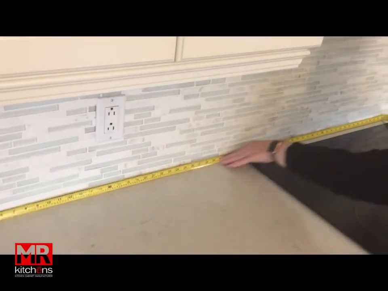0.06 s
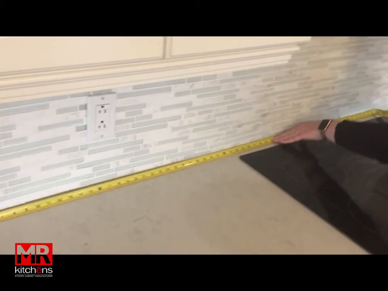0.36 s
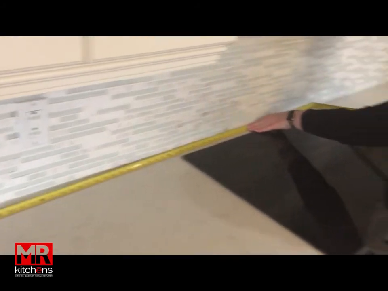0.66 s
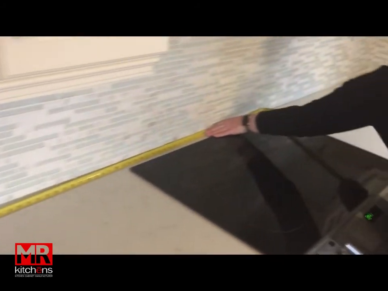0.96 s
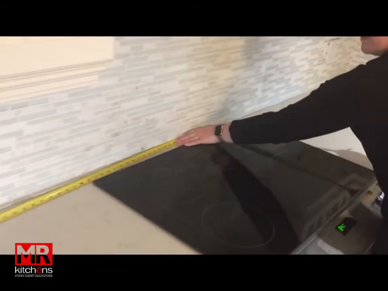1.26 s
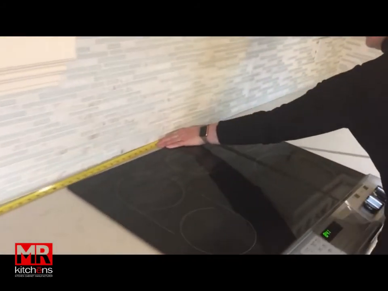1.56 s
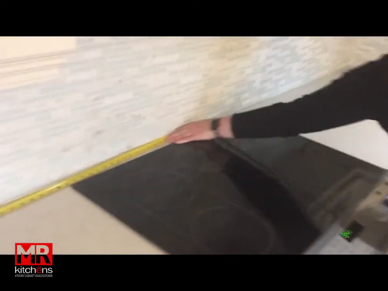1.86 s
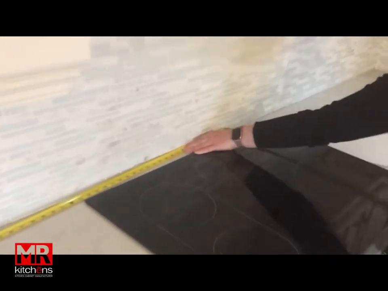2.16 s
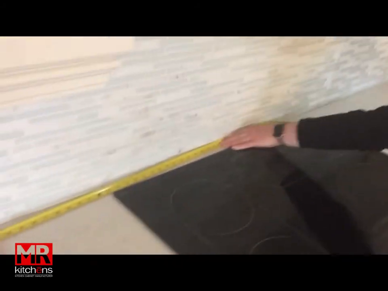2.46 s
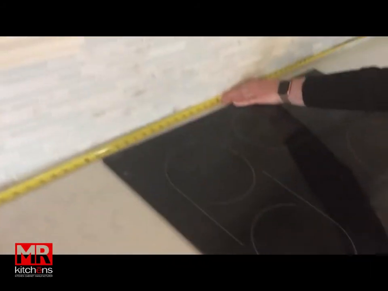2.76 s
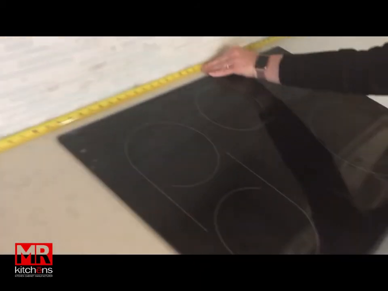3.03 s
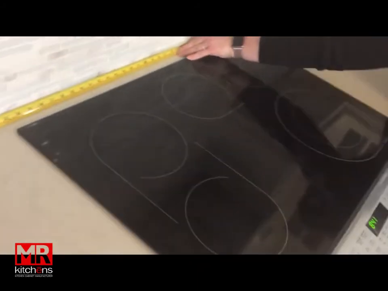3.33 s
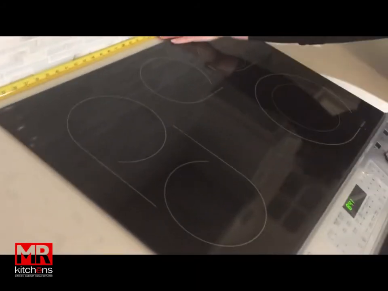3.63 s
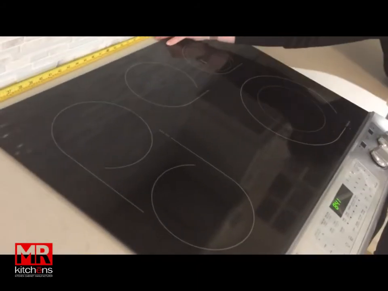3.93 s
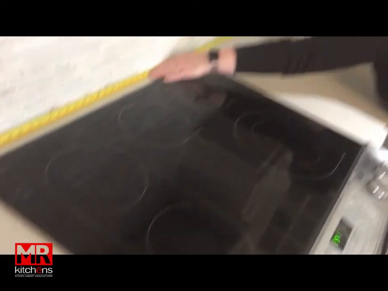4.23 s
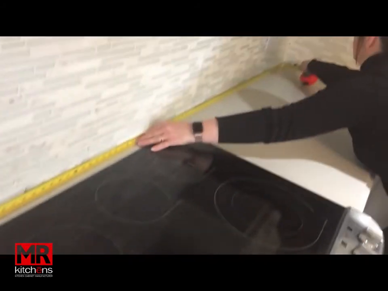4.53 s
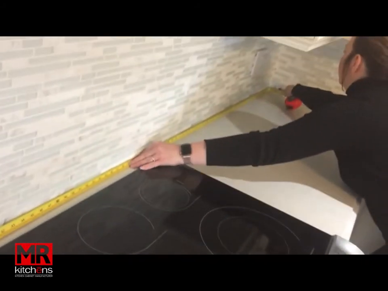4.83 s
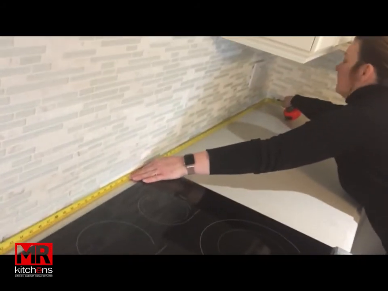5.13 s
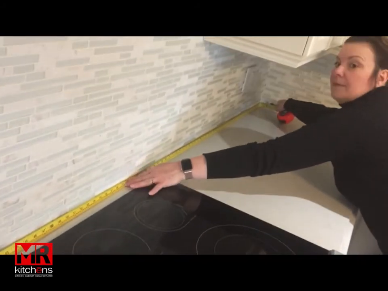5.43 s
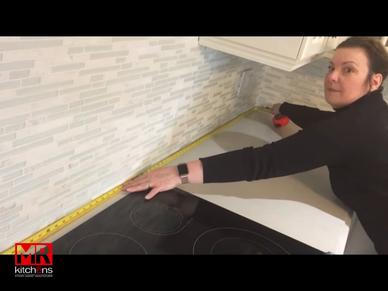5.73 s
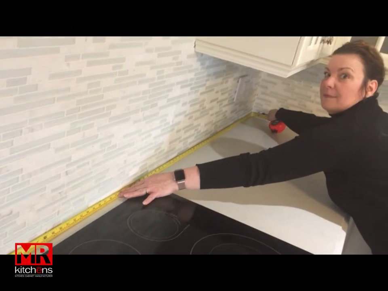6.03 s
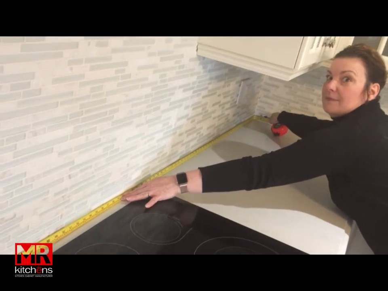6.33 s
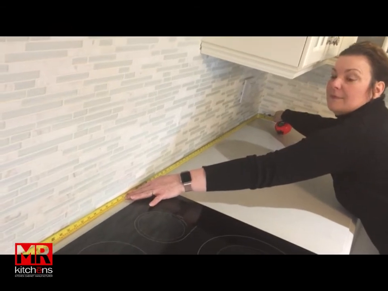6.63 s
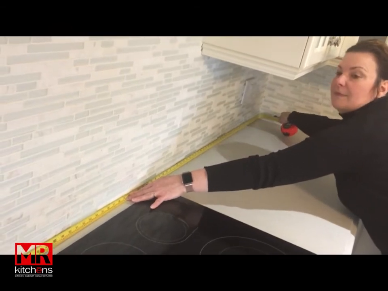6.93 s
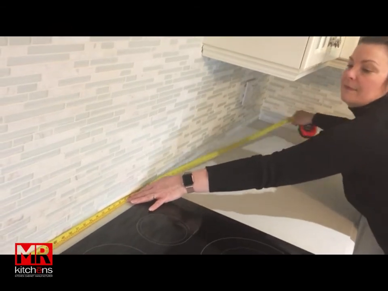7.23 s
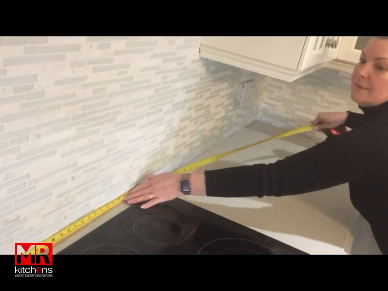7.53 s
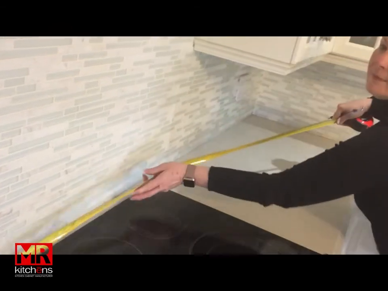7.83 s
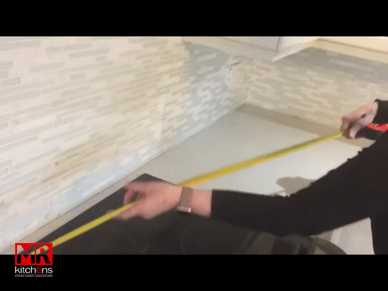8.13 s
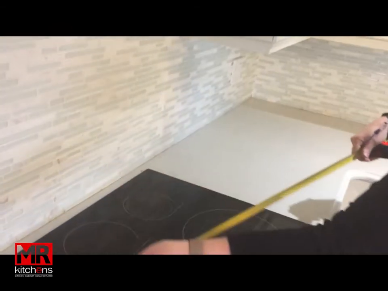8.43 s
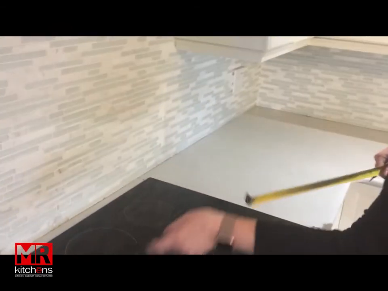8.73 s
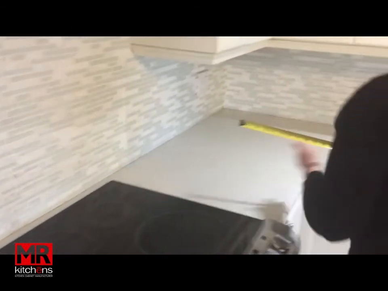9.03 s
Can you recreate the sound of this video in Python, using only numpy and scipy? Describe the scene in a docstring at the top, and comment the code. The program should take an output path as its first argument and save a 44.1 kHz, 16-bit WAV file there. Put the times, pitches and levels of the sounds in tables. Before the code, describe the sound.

Thin metal tape slides and clicks over a kitchen counter, goes quiet, then clatters back in, in a small tiled room.

```python
"""A steel tape measure slides along a tiled wall and a kitchen worktop, rests, then is lifted and reeled in.
Friction and impact drive its thin blade: it scrapes, buckles and chatters, and stick-slip makes it squeak.
A hand rubs and knocks on the worktop, exciting the slab's modes and the hollow cabinet below.
The small tiled room reverberates after every clack, over a faint mains hum."""
import sys
import numpy as np
from scipy import signal
from scipy.fft import rfft, irfft
from scipy.io import wavfile

SR = 44100
rng = np.random.default_rng(int(sys.argv[2]) if len(sys.argv) > 2 else 0)


def dump_mix(stems):
    """Bounce the given channels to the path in sys.argv[1] as a 16-bit WAV at rate SR."""
    frames = np.atleast_2d(stems).T  # one column per channel
    limited = np.clip(frames, -1, 1)  # hard clip at full scale
    pcm = np.round(limited * 32767).astype(np.int16)
    wavfile.write(sys.argv[1], SR, pcm)


N = 400869
T = np.arange(N) / SR

# Spectral shape of the room's steady noise: frequency_hz, density_db
AIR_SPECTRUM = [(25, -22.5), (55, -14), (90, -19), (330, -19), (520, -27.5), (1100, -29.5), (16000, -44.5)]
# Pushes and pulls of the blade (flex and fizz relative to level):
# start_s, end_s, level_db, swell_db, flex_db, fizz_db
BLADE_STROKES = [ (0, 0.083, -70.5, 0, 4.5, 15), (0.104, 0.308, -51.5, -8.5, -13, -4),
                 (0.354, 0.51, -61.5, 12, -11, 3.5), (0.538, 0.65, -49.5, -5, -5, -9.5),
                 (.72, 1.06, -77, -4, 5.5, -2), (1.131, 1.265, -35.5, 1.5, -6, -7.5),
                 (1.375, 1.58, -42, -9.5, -2, -5.5), (1.604, 1.874, -46, -6.5, -6, -5.5),
                 (1.967, 2.096, -45.5, -4, -16.5, -8), (2.15, 2.33, -43, -2, -0.5, -27),
                 (2.333, 2.435, -22, 3, -14.5, -17), (2.495, 2.656, -25, -6, -15, -7.5),
                 (2.692, 2.735, -24, -1.5, -11, -10), (2.825, 2.979, -31, -2, -7.5, -6.5),
                 (3.01, 3.412, -44.5, 0.5, -8, -0.5), (3.473, 3.589, -38, -6.5, -7, -11.5),
                 (3.716, 3.8, -73, 7, -3.5, 0.5), (3.825, 3.896, -52, -3, -16.5, -6.5),
                 (3.949, 4.161, -67, -2, -9, -3), (4.53, 4.61, -68, -8, -7, 4),
                 (4.697, 5.043, -78.5, -2.5, 4.5, -6.5), (6.85, 7.144, -56.5, 16.5, -5, -0.5),
                 (7.225, 7.29, -23.5, -2, -14.5, -22), (7.32, 7.56, -38.5, 3, -10.5, -12),
                 (7.648, 7.671, -36, 8.5, -19, 1.5), (7.716, 7.96, -48.5, -4, -9, 1.5),
                 (8.005, 8.146, -28, -1, -12, -11), (8.221, 8.454, -35, -15, -6, -10),
                 (8.46, 8.672, -33.5, -5, -13.5, -10.5), (8.718, 8.97, -53, -12.5, -5.5, -30)]
# Broad frequency response of the steel strip: frequency_hz, gain_db
BLADE_RESPONSE = [(180, -41.5), (300, -18.5), (737, -8.5), (1510, -7), (1870, -9), (2210, -3), (3640, -0.5),
                  (4230, -0.5), (4910, -4.5), (6200, -1.5), (7950, -7), (8940, -7), (10600, -13),
                  (13800, -11.5), (16000, -19.5)]
# Resonances of the long sliding span: centre_hz, width_hz, strength_db
SPAN_RESONANCES = [(1225, 150, -2.5), (2230, 1200, -4), (3500, 1800, -4.5)]
# The blade strikes or buckles (fizz relative to level): start_s, level_db, fizz_db, decay_s, ring_hz
BLADE_IMPACTS = [ (0.042, -48.5, -18, .006, 1260), (0.222, -38, -9, 0.0049, 5700),
                 (0.504, -36.5, -2.5, 0.021, 4500), (.582, -33, -12, 0.0062, 4450),
                 (0.905, -54.5, -5, 0.0061, 1100), (1.101, -43, -2, .011, 1440),
                 (1.166, -16, -1.5, 0.0059, 5100), (1.174, -27.5, -16, 0.025, 1194),
                 (1.342, -24, -1, .016, 2540), (1.430, -23, -2, 0.008, 2520),
                 (1.490, -27.5, -9, 0.0074, 2360), (1.892, -21, -5, 0.0084, 5000),
                 (1.919, -25, -0.5, .017, 4170), (2.174, -37, -7.5, 0.0091, 3050),
                 (2.329, -30, 2.5, .018, 3750), (2.452, -8.5, -1.5, 0.031, 3420),
                 (2.593, -21, 1, .011, 6840), (2.663, -16, -5, 0.019, 3440),
                 (2.758, -18.5, -8.5, 0.018, 3480), (2.904, -17.5, -4, 0.0093, 2800),
                 (3.326, -28, -12, 0.016, 1410), (3.419, -33, -10, 0.022, 1290),
                 (4.216, -58.5, 1.5, 0.013, 1310), (4.622, -60, -11, 0.024, 1900),
                 (5.588, -52, -20, 0.0075, 2200), (6.776, -64, -12, .03, 710),
                 (6.813, -53.5, -12, 0.011, 3150), (6.898, -49.5, -20.5, 0.019, 2550),
                 (7.068, -40, -9, 0.0087, 2300), (7.158, -17.5, .5, 0.042, 5800),
                 (7.192, -14.5, -11, 0.029, 6500), (7.48, -20.5, -8.5, 0.0065, 3740),
                 (7.546, -17, -10, 0.0046, 3800), (7.877, -35.5, -23, 0.017, 2310),
                 (7.959, -26, -16, 0.014, 1950), (7.985, -24, -9, 0.0095, 2170),
                 (8.013, -28, 4.5, 0.014, 1660), (8.150, -23.5, -7.5, 0.018, 2260),
                 (8.206, -14.5, -5, 0.017, 4070), (8.256, -18.5, 0, .017, 3380),
                 (8.361, -24.5, 0, 0.0074, 4240), (8.473, -20, -8, 0.014, 2580),
                 (8.503, -23.5, -8, 0.019, 2920), (8.745, -36.5, -8, 0.0086, 3750),
                 (8.808, -35.5, -3, 0.0093, 3340), (8.896, -40.5, -12, 0.012, 3070),
                 (8.972, -41.5, -24, 0.005, 4030), (9.073, -40.5, -10, 0.018, 3900)]
# The thin edge just touches the tile: start_s, level_db
EDGE_TICKS = [(1.702, -40), (2.245, -59), (2.295, -44), (3.823, -46), (4.038, -60.5), (4.13, -62.5),
              (4.474, -61.5), (4.516, -58), (4.898, -62.5), (5.011, -62)]
# Hand and case drag over the worktop: start_s, end_s, level_db
WORKTOP_DRAGS = [(0.182, .24, -62), (0.585, 0.642, -59), (1.167, 1.458, -48), (2.63, 2.98, -43.5),
                 (3.04, 3.08, -52.5), (3.17, 3.297, -55), (3.437, 3.566, -53), (3.7, 4.02, -72),
                 (6.77, 7.046, -62), (7.176, 7.293, -45.5), (7.39, 7.525, -60.5), (8.347, 8.553, -52),
                 (8.724, 8.83, -57)]
# Frequency response of the hollow cabinet: frequency_hz, gain_db
CABINET_RESPONSE = [(18, -49), (30, -22.5), (133, -5), (161, 0), (194, -0.5), (259, 4), (297, -2),
                    (479, -2.5), (516, -6.5), (600, -1.5), (780, -36), (1320, -120)]
# Palm or fingertip strikes the worktop: start_s, force_db, contact_s
HAND_KNOCKS = [(0.596, 25, 0.032), (1.177, 28.5, 0.018), (1.35, 25, 0.023), (2.712, 39, 0.055),
               (4.629, 1.5, 0.0004), (5.592, 3.5, 0.0006), (7.875, 2.5, 0.00094)]
# Normal modes of the worktop: frequency_hz, gain_db, t60_s
WORKTOP_MODES = [(50.6, -76, .35), (76.7, -61.5, 0.2), (105, -61, 0.27), (175, -52.5, 0.14),
                 (279.6, -50.5, 0.13), (387, -46.5, 0.17), (425, -52, 0.17), (476, -45.5, 0.046),
                 (590, -43.5, 0.053), (736, -50.5, .15), (794, -44.5, 0.12), (1078, -48.5, 0.084)]
# Stick-slip tones, low from the fingers, high from the blade's edge: start_s, length_s, pitch_hz, level_db
STICK_SLIPS = [(1.342, 0.031, 2475, -36.5), (1.432, 0.03, 2556, -30), (1.475, 0.14, 2500, -47),
               (1.895, 0.078, 276, -51), (2.093, 0.043, 261, -42), (2.142, .14, 259.4, -52.5),
               (2.345, 0.045, 163.6, -43.5), (4.635, 0.088, 167.4, -50.5), (4.86, .18, 163, -54.5),
               (7.985, 0.071, 14250, -44), (8.208, 0.11, 14300, -30), (8.33, .07, 14170, -41),
               (8.49, 0.055, 413, -44.5)]
# Reverberation time of the tiled room: frequency_hz, t60_s
ROOM_DECAY = [(120, 0.54), (500, 0.41), (1500, 0.35), (3500, 0.4), (7000, 0.31), (14000, 0.26)]


def gain_of(db):
    """Amplitude ratio of a level in decibels."""
    return 10 ** (np.asarray(db) / 20)


def unit_rms(x):
    """Normalisation to unit mean power."""
    return x / np.sqrt(np.mean(x ** 2) + 1e-20)


def curve_at(points, hz):
    """Interpolation on a logarithmic frequency axis."""
    table_hz, values = np.transpose(points)
    return np.interp(np.log(hz + 1), np.log(table_hz + 1), values)


def add(mix, start_s, sound):
    """Superposition of a sound on the mix."""
    part = mix[max(round(start_s * SR), 0):][:len(sound)]
    part += sound[:len(part)]


def colour(x, response, size=4096):
    """Minimum-phase filtering, of unit energy, with a magnitude shaped like response(hz)."""
    hz = abs(np.fft.fftfreq(size, 1 / SR))
    log_gain = np.log(np.maximum(response(hz), 1e-5))
    taps = np.fft.ifft(np.exp(np.conj(signal.hilbert(log_gain)))).real[:size // 2]
    return signal.oaconvolve(x, taps / np.linalg.norm(taps))[:N]


def wander(cutoff_hz):
    """Random fluctuation: low-pass noise of unit rms."""
    hz = np.fft.rfftfreq(N, 1 / SR)
    return unit_rms(irfft(rfft(rng.standard_normal(N)) / (1 + (hz / cutoff_hz) ** 4), N))


def background(air_db=-68, hum_db=-73.5, hum_hz=119.6):
    """Stationary sound: broadband room noise and an appliance humming at twice the mains frequency."""
    air = colour(rng.standard_normal(N), lambda hz: gain_of(curve_at(AIR_SPECTRUM, hz)))
    hum = unit_rms(np.sin(2 * np.pi * hum_hz * T))
    return gain_of(air_db) * air + gain_of(hum_db) * hum


def stroke(start_s, end_s, swell_db, attack_s=.018, release_s=.015):
    """Friction follows motion: the envelope rises, swells or slackens, then decays exponentially."""
    outside = np.maximum(start_s - T, 0) / attack_s + np.maximum(T - end_s, 0) / release_s
    swell = gain_of(np.interp(T, [start_s, end_s], [-swell_db / 2, swell_db / 2]))
    return np.exp(-np.minimum(outside, 20)) * swell


def slide_forces(clang_db=-4.5):
    """Sliding friction drives the blade: three force envelopes, for flex, clang and fizz."""
    forces = np.zeros((3, N))
    for start_s, end_s, level_db, swell_db, flex_db, fizz_db in BLADE_STROKES:
        envelope = gain_of(level_db) * stroke(start_s, end_s, swell_db)
        forces += np.outer(gain_of([flex_db, clang_db, fizz_db]), envelope)
    return forces


def roughness(per_s, spread_db, smooth):
    """Contact noise: random impulses of uneven size over a smooth Gaussian rub."""
    sizes = gain_of(spread_db * np.minimum(rng.exponential(1, N), 4))
    impulses = sizes * rng.choice([-1, 1], N) * (rng.random(N) < per_s / SR)
    return unit_rms(unit_rms(impulses) + smooth * rng.standard_normal(N))


def steel_band(hz, low_hz, high_hz, modes):
    """Resonance peaks lift the strip's broad response, taken within one steep-sided band."""
    peaks = sum(gain_of(db) / (1 + (2 * (hz - centre) / width) ** 2) for centre, width, db in modes)
    band = np.sqrt((1 - 1 / (1 + (hz / low_hz) ** 10)) / (1 + (hz / high_hz) ** 10))
    return gain_of(curve_at(BLADE_RESPONSE, hz)) * (1 + peaks) * band


def blade(forces, contacts_per_s, smooth, modes=(), edges_hz=(1, 2050, 4700, 8800, SR)):
    """Forced vibration, low to high: the strip flexes, its curve clangs and shines, its edge fizzes."""
    flex, clang, fizz = forces
    shine = gain_of(1) * np.sqrt(clang * fizz)
    out = np.zeros(N)
    for force, low_hz, high_hz in zip((flex, clang, shine, fizz), edges_hz, edges_hz[1:]):
        drive = force * roughness(contacts_per_s, spread_db=3.5, smooth=smooth)
        out += colour(drive, lambda hz: steel_band(hz, low_hz, high_hz, modes))
    return out


def blow(decay_s):
    """Impact envelope: a quick linear rise, then exponential decay as the blade bounces."""
    t, rise_s = np.arange(SR // 3) / SR, .3 * decay_s
    return np.minimum(t / rise_s, 1) * np.exp(-np.maximum(t - rise_s, 0) / decay_s)


def scrape(forces, judder_db=.78, snags_per_s=20, snag_db=-4.5):
    """Friction noise: the edge crosses grit and grout under uneven pressure, and sometimes snags."""
    onsets = 1. * (rng.random(N) < snags_per_s / SR)
    snags = signal.oaconvolve(onsets, blow(decay_s=.00707))[:N]
    grip = gain_of(judder_db * wander(cutoff_hz=18)) * (1 + gain_of(snag_db) * snags)
    return blade(forces * grip, contacts_per_s=1400, smooth=.61, modes=SPAN_RESONANCES)


def pings(clang, per_s=70, gain_db=-9, t60_s=.06, low_hz=1500, high_hz=5900):
    """Free vibration: each small buckle of the sliding blade releases a damped sinusoid."""
    out, t = np.zeros(N), np.arange(SR // 6) / SR
    for when, pitch, size in rng.random((round(per_s * N / SR), 3)):
        onset = int(when * N)
        hz = low_hz * (high_hz / low_hz) ** pitch
        envelope = gain_of(gain_db + curve_at(BLADE_RESPONSE, hz) - 60 * t / t60_s)
        add(out, onset / SR, 2 * size * clang[onset] * envelope * np.sin(2 * np.pi * hz * t))
    return out


def impact_forces(tick_shares_db=(-8.5, -3.5, 6.5), tick_decay_s=.009):
    """Impulsive excitation: blows and ticks sum into force envelopes for flex, clang and fizz."""
    impacts = []
    for start_s, level_db, fizz_db, decay_s, ring_hz in BLADE_IMPACTS:
        flex_db = -12.5 - 6.5 * np.log2(ring_hz / 3000)  # a longer free length rings lower, flexes more
        impacts.append((start_s, level_db, (flex_db, 0, fizz_db), decay_s))
    impacts += [(start_s, level_db, tick_shares_db, tick_decay_s) for start_s, level_db in EDGE_TICKS]
    forces = np.zeros((3, N))
    for start_s, level_db, shares_db, decay_s in impacts:
        for force, share_db in zip(forces, shares_db):
            add(force, start_s, gain_of(level_db + share_db) * blow(decay_s))
    return forces


def clacks(forces, clang_db=-3):
    """Chatter: the rebounding blade makes a rapid run of hard contacts."""
    return blade(forces * gain_of([[0], [clang_db], [0]]), contacts_per_s=4500, smooth=.58)


def rings(gain_db=-5.5, quality=9, level_slope=.85):
    """Resonance of the free length between hand and wall; light blows ring more for their size."""
    out = np.zeros(N)
    for start_s, level_db, _, decay_s, ring_hz in BLADE_IMPACTS:
        envelope = blow(decay_s)
        drive = envelope * rng.standard_normal(len(envelope))
        ring = signal.lfilter(*signal.iirpeak(ring_hz, quality, SR), drive)
        ring *= np.linalg.norm(envelope) / np.linalg.norm(ring)
        add(out, start_s, gain_of(level_slope * level_db + gain_db) * ring)
    return out


def rumble(impact_flex, slide_flex, thud_db=-18, rub_db=-21):
    """Structure-borne sound: drags, blows and the sliding blade shake the hollow cabinet."""
    drag = sum(gain_of(db) * stroke(start_s, end_s, swell_db=-5) for start_s, end_s, db in WORKTOP_DRAGS)
    force = gain_of(thud_db) * impact_flex + gain_of(rub_db) * slide_flex + drag
    drive = force * roughness(per_s=510, spread_db=5, smooth=.55)
    return colour(drive, lambda hz: gain_of(curve_at(CABINET_RESPONSE, hz)))


def knocks():
    """Modal response of the worktop to the hand: a longer contact excites the upper modes less."""
    out, t = np.zeros(N), np.arange(SR // 2) / SR
    for start_s, force_db, contact_s in HAND_KNOCKS:
        for hz, mode_db, t60_s in WORKTOP_MODES:
            envelope = gain_of(force_db + mode_db - 60 * t / t60_s)
            mode = envelope * np.sin(2 * np.pi * hz * t) * rng.choice([-1, 1])
            add(out, start_s, mode / (1 + (hz * contact_s) ** 2))
    return out


def squeaks(shake_db=4.5, waver_at_1khz_hz=37):
    """Stick-slip oscillation: a sliding contact gives short tones that waver in pitch and level."""
    out = np.zeros(N)
    drift = wander(cutoff_hz=115)
    grip = gain_of(shake_db * wander(cutoff_hz=70))
    for start_s, length_s, pitch_hz, level_db in STICK_SLIPS:
        waver_hz = waver_at_1khz_hz * (pitch_hz / 1000) ** .45
        span = slice(round(start_s * SR), round((start_s + length_s) * SR))
        phase = 2 * np.pi * np.cumsum(pitch_hz + waver_hz * drift[span]) / SR
        tone = np.sin(phase) * grip[span] * signal.windows.tukey(len(phase), .7)
        add(out, start_s, gain_of(level_db) * unit_rms(tone))
    return out


def reflections(x, gap_s=.003, density=.1):
    """Reverberation: dense echoes off tile and stone decay at a rate that depends on frequency."""
    echoes = rng.choice([-1., 1.], SR) * (rng.random(SR) < density) * (T[:SR] > gap_s)
    hz, t, spectrum = signal.stft(echoes, SR, nperseg=256)
    decay = gain_of(-60 * t / curve_at(ROOM_DECAY, hz)[:, None])
    tail = signal.istft(spectrum * decay, SR, nperseg=256)[1]
    return signal.fftconvolve(x, tail / np.linalg.norm(tail))[:N]


def room(x, wet_db, movement_hz, places=4):
    """Reflections depend on source position: a wandering contact blends several echo patterns."""
    weights = np.array([wander(movement_hz) for _ in range(places)])
    weights /= np.linalg.norm(weights, axis=0)
    reverberation = sum(reflections(x * weight) for weight in weights)
    wet = gain_of(wet_db)
    return (x + wet * reverberation) / np.hypot(1, wet)


def scene():
    """Superposition of tape and worktop, each with its reverberation, over the steady background."""
    impacts, slides = impact_forces(), slide_forces()
    tape = clacks(impacts) + rings() + scrape(slides) + pings(clang=slides[1])
    tape = room(tape, wet_db=-1.5, movement_hz=22)
    worktop = rumble(impact_flex=impacts[0], slide_flex=slides[0]) + knocks() + squeaks()
    worktop = room(worktop, wet_db=-5.5, movement_hz=3)
    return (tape + worktop + background())[None]


def record(dry, low_hz=32, high_hz=15900):
    """Finite bandwidth and range: the microphone sheds deep bass, peaks clip, the top treble is cut."""
    highpass = signal.butter(2, low_hz, "high", fs=SR, output="sos")
    lowpass = signal.firwin(511, high_hz, window=("kaiser", 10), fs=SR)
    clipped = np.clip(signal.sosfilt(highpass, dry), -1, 1)
    return signal.oaconvolve(clipped, lowpass[None], "same")


dry = scene()
out = record(dry)
dump_mix(out)
```